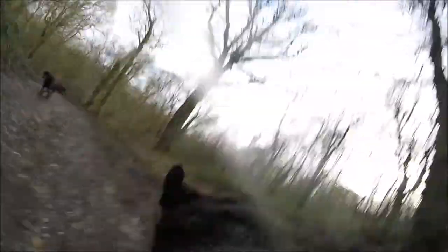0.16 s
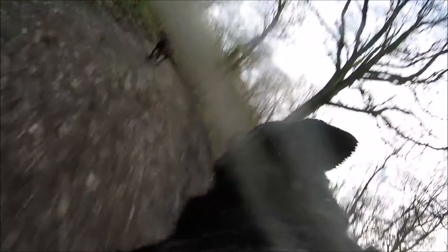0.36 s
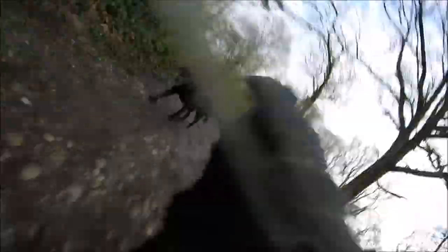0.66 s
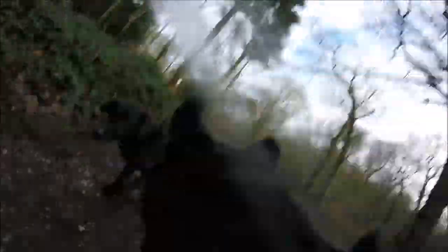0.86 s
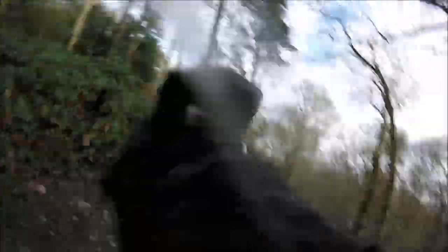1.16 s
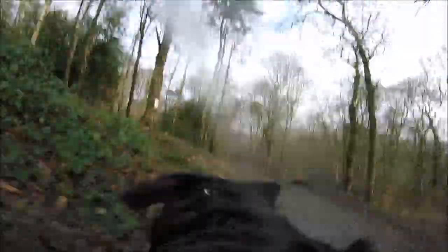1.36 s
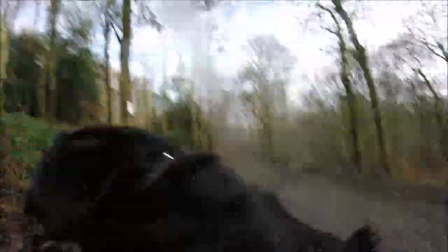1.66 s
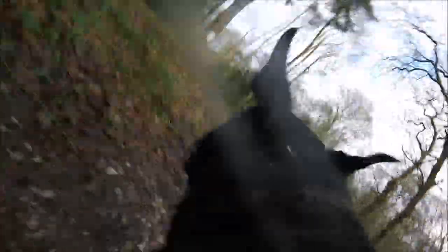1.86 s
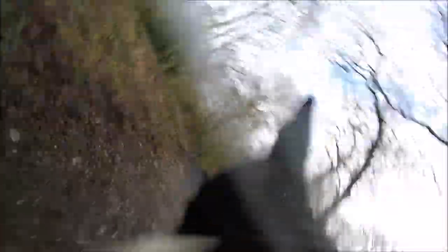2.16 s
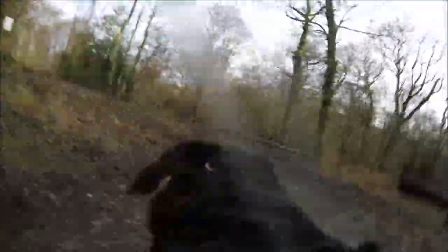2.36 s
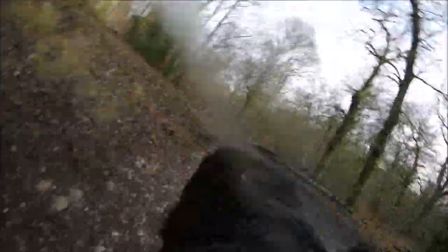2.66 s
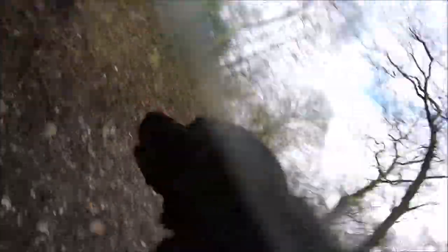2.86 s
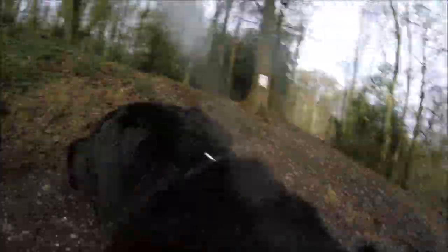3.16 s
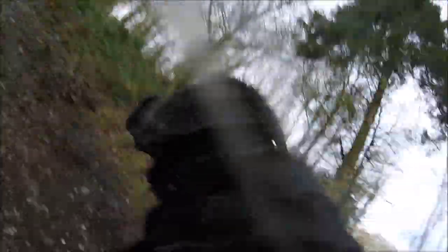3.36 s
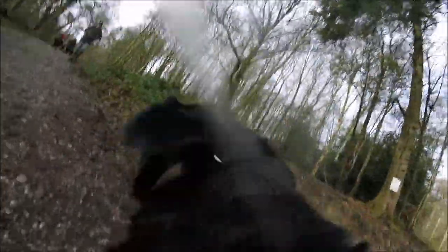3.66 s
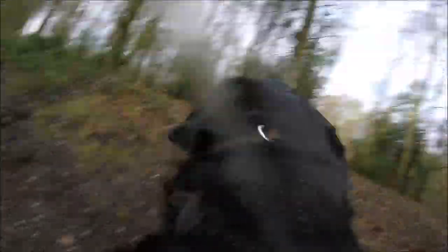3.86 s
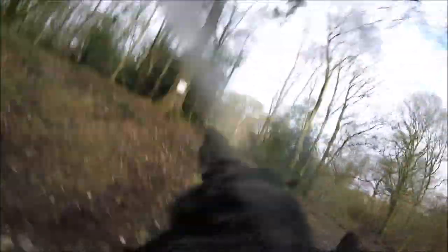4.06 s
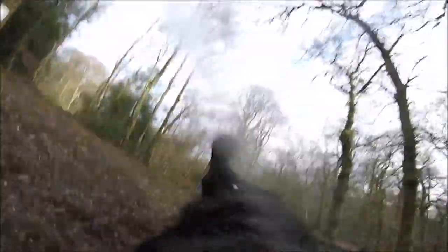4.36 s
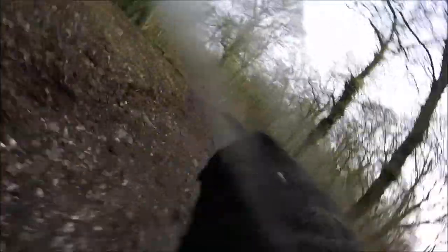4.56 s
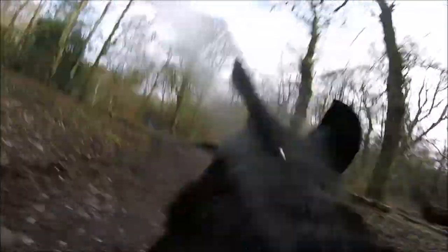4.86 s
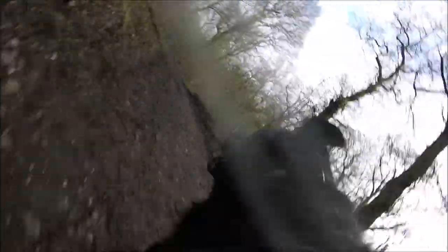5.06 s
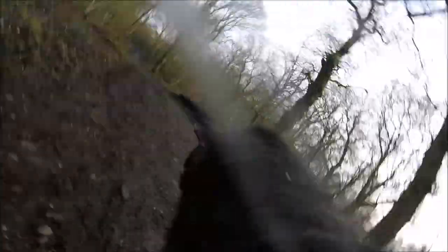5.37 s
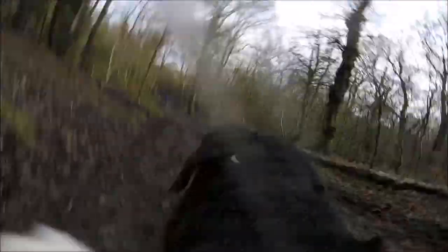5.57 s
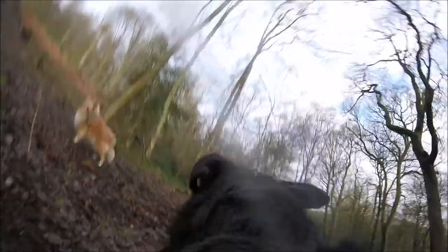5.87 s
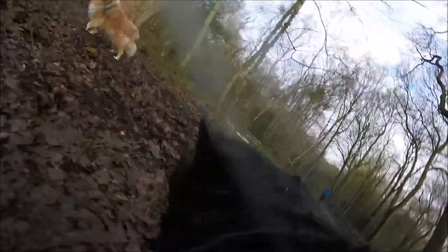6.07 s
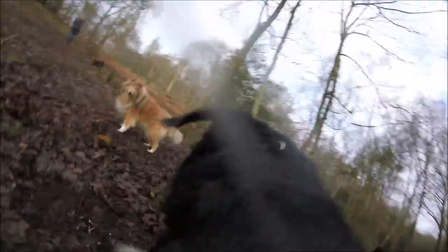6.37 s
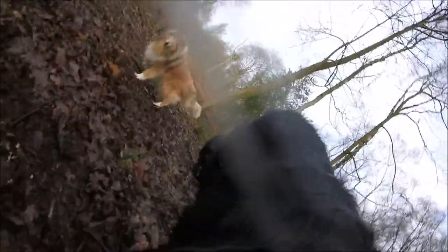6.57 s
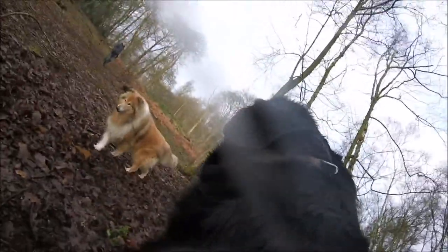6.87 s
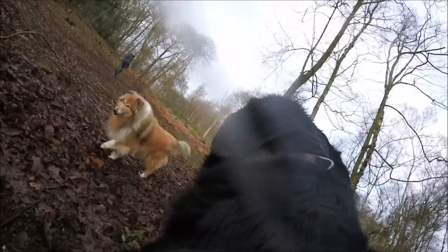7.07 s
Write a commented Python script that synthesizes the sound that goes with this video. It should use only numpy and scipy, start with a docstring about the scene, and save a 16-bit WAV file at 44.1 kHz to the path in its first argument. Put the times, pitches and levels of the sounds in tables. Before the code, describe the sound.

A microphone inside a small plastic housing on a running dog's back picks up close, dry contact noise, with almost no woodland ambience. A heavy thump and strap scrape open the scene, followed by hard knocks near 0.1, 0.2 and 0.5 seconds and a strong double clack at 0.93. Knocks and tiny buckle ticks chatter on, with sharp hits at 1.4 and 1.66, and a heavy jolt with a cluster around 2.2 to 2.35. From about 2.6 to 4 it is sparser: light clicks, low rumble, short gritty rasps. Rubbing swells at 4.1 with a knock, then firm clacks return at 4.5, 5.06, 5.5 and 5.77, with metallic clicks around 5.7. A very brief dropout comes at 5.9. Softer knocks and bright strap rasps continue around 6.3 to 6.7, then the rattling stops, leaving fading rumble and faint hiss until about 7.2.

```python
"""On a woodland trail a dog runs along with a small camera strapped to its back.
The harness fittings knock and chatter against the plastic housing: short pushes, decaying modes and noise cracks.
Straps and fur rub on the same housing: clicks and noise pass through its resonances.
The bouncing body thumps (short swings) and rumbles (low noise), and a faint hiss of coloured noise lies behind."""
import sys
import numpy as np
from scipy import signal
from scipy.fft import rfft, irfft
from scipy.io import wavfile
from scipy.ndimage import uniform_filter1d, minimum_filter1d

SR = 44100
rng = np.random.default_rng(int(sys.argv[2]) if len(sys.argv) > 2 else 0)


def int16_out(signal):
    """Quantize to a 16-bit WAV file."""
    q = np.round(np.clip(np.atleast_2d(signal).T, -1, 1) * 32767)
    wavfile.write(sys.argv[1], SR, q.astype(np.int16))


N = 318402  # length [samples]

# modes of the housing's shell: (frequency [Hz], relative level [dB], time to fall by 60 dB [s])
SHELL_MODES = [(1340, -18, 0.028), (1543, 5, 0.025), (1604, 2, 0.027), (1830, -30, 0.22), (910, -34, .1),
               (544, -13, 0.011)]
# modes of the housing's back plate: (frequency [Hz], relative level [dB], time to fall by 60 dB [s])
PLATE_MODES = [(912.6, -9, 0.033), (984, -6.5, 0.0071), (912, -20, 0.082), (1838, -41.5, 0.18)]
# modes of the metal buckles: (frequency [Hz], relative level [dB], time to fall by 60 dB [s])
BUCKLE_MODES = [(2238, 30, .014), (2396, 26.5, 0.012), (2500, -15.5, 0.021), (2500, -32.5, 0.16),
                (1740, -24, .18), (2780, -1, 0.0034), (3220, -15, 0.0066), (3180, -9, 0.01),
                (3860, -25.5, 0.0073), (3880, -10.5, 0.0075), (4730, 1, .008)]
# spectrum of the hard edge of a contact: (frequency [Hz], relative level [dB])
EDGE_SPECTRUM = [(3500, -32), (5100, -3.5), (6000, 7.5), (7200, -3), (8700, -3), (10000, -16.5),
                 (13500, -21), (15500, -47)]
# background hiss, which the straps' faint creeping follows too: (time [s], level [dB])
HISS_LEVEL = [(0, -46), (.3, -63), (.75, -64), (1.85, -67.5), (2.28, -55), (2.4, -66), (2.75, -64.5),
              (3.3, -63), (4.1, -52), (4.16, -65.5), (4.8, -62), (5.04, -59), (5.12, -56.5), (5.45, -66),
              (5.85, -57.5), (6.3, -59.5), (6.75, -58), (7.22, -64.5)]
# the dog's footfalls:
# (time [s], jolt strength [dB], swing of the mount [Hz], strap rub strength [dB], half length of the rub [s])
STRIDES = [(0.024, -9, 25.1, -47.5, 0.071), (.19, -21.5, 30, -55, 0.07), (0.553, -22.5, 30.7, -55.5, 0.054),
           (0.919, -15.5, 40.4, -64, 0.022), (1.251, -28, 30, -63, 0.064),
           (1.517, -24.5, 54.5, -58.5, 0.077), (1.788, -30.5, 41.2, -57.5, 0.028),
           (2.228, -9, 57.3, -48.5, 0.033), (2.546, -28.5, 41, -61, 0.25), (2.865, -31, 30.2, -57.5, 0.032),
           (3.113, -20.5, 30, -61, 0.11), (3.754, -16.5, 41, -59, .08), (4.069, -22.5, 29.8, -46, 0.029),
           (4.589, -26, 34.7, -55.5, 0.058), (4.943, -16.5, 48, -54.5, 0.063),
           (5.344, -11.5, 35.7, -47, 0.043), (5.678, -15, 36.7, -49.5, 0.14), (6.08, -14, 26.6, -61, 0.053),
           (6.456, -15, 22.76, -45.5, 0.05)]


def undb(db):
    """Turn decibels into gain."""
    return 10 ** (np.asarray(db) / 20)


def unit(x):
    """Scale to rms 1."""
    return x / np.sqrt(np.mean(x ** 2))


def curves(table):
    """Join the columns of a table by straight lines in time."""
    s, *columns = np.transpose(table)
    return [np.interp(np.arange(N) / SR, s, column) for column in columns]


def colour(x, points):
    """Give a signal the spectrum of (Hz, dB) points, at rms 1."""
    hz, db = np.transpose(points)
    f = np.arange(len(x) // 2 + 1) * SR / len(x)
    gain = undb(np.interp(np.log(f + 1), np.log(hz), db))
    return unit(irfft(rfft(x) * gain, len(x)))


def resonate(x, peaks):
    """Pass a signal through parallel (Hz, width in Hz, dB) resonances."""
    return sum(undb(db) * signal.lfilter(*signal.iirpeak(hz, hz / width, SR), x) for hz, width, db in peaks)


def cut(x, hz, kind, order=4):
    """Keep what lies below ("low") or above ("high") a frequency."""
    return signal.sosfilt(signal.butter(order, min(hz, SR * .45), kind, fs=SR, output="sos"), x)


def walk(rate):
    """Wander between random values, `rate` steps a second; hold the last value after 999 steps."""
    steps = np.arange(N) / SR * rate
    return np.interp(steps, np.arange(1000), rng.standard_normal(1000))


def add(track, start_s, sound):
    """Mix a sound into a track, leaving out what lies beyond its ends."""
    i = int(start_s * SR)
    part = sound[max(-i, 0):N - i]
    track[max(i, 0):max(i, 0) + len(part)] += part


def swell(middle_s, half_length_s, db):
    """The power of one smooth stroke that rises and falls."""
    power, t = np.zeros(N), np.arange(-14000, 14000) / SR
    stroke = undb(db) ** 2 * np.exp(-np.abs(t / half_length_s) ** 3)
    add(power, middle_s + t[0], stroke)
    return power


def ring(modes, t, detune, scatter_db):
    """Decaying modes; every contact point weights and loads them a little differently."""
    hz, db, t60 = np.transpose(modes)[:, :, None]
    load, weight = rng.uniform(-0.82, 1, (2, len(modes), 1))
    hz = hz + detune * load / t60  # well damped modes shift most
    level_db = db + scatter_db * weight - 60 * t / t60
    return np.sum(undb(level_db) * np.sin(2 * np.pi * hz * t), axis=0)


def chatter(sound, gap_s, rebound, count=2):
    """A loose fitting rebounds within milliseconds, on average weaker each time."""
    out, lag = sound.copy(), 0
    for k, (wait, force) in enumerate(rng.uniform(.5, 1.5, (count, 2))):
        lag += max(int(gap_s * wait * SR), 1)
        out[lag:] += rebound ** (k + 1) * force * sound[:-lag]
    return out


def blow(sound, db):
    """Set a short sound's level: its whole energy, counted as rms over 10 ms."""
    return sound * undb(db) * np.sqrt(.01 * SR / np.sum(sound ** 2))


def hiss():
    """A faint coloured noise that comes and goes with its level table."""
    # spectrum of the hiss: (frequency [Hz], relative level [dB])
    hiss_spectrum = [(100, -5), (300, -4), (600, -6), (1200, -11), (2500, -8.5), (4000, -17), (7000, -27.5),
                     (10000, -31), (14000, -41)]
    hiss_db, = curves(HISS_LEVEL)
    return colour(rng.standard_normal(N), hiss_spectrum) * undb(hiss_db)


def body(swing_cycles=0.78, shudder_db=-15.5):
    """The running dog shakes the camera: each footfall swings the mount briefly and swells an uneven rumble."""
    # spectrum of the rumble: (frequency [Hz], relative level [dB])
    rumble_spectrum = [(8, 3.5), (25, 3.5), (50, -4.5), (80, -13), (125, -20.5), (200, -33.5), (350, -40.5),
                       (700, -91)]
    # rumble that goes on between footfalls, before its random unevenness: (time [s], level [dB])
    rumble_level = [(0, -27), (.35, -33), (1.9, -37), (2.7, -33), (3.3, -34), (3.95, -23), (4.4, -38.5),
                    (5.2, -37), (6.6, -33.5), (7.22, -45.5)]
    shake_db, shake_spread = -9, 1.26  # rumble of a footfall against its jolt; its length against the rub's
    rumble_db, = curves(rumble_level)
    shakes = sum(swell(s, shake_spread * half_s, db + shake_db) for s, db, _, _, half_s in STRIDES)
    power = undb(rumble_db) ** 2 + shakes
    out = colour(rng.standard_normal(N), rumble_spectrum) * np.sqrt(power) * undb(2.4 * walk(10))

    shudder_spectrum = [(40, -21.5), (80, 5.5), (130, -8.5), (220, -22.5), (500, -43.5), (900, -91.0)]
    shudder = colour(rng.standard_normal(N), shudder_spectrum)
    strain, t = np.zeros(N), np.arange(-4000, 4000) / SR
    for s, db, hz, _, _ in STRIDES:
        bounce = undb(db) * np.exp(-(hz * t / swing_cycles) ** 2)
        add(out, s + t[0], bounce * np.sin(2 * np.pi * hz * t + 1.0))
        add(strain, s + t[0], bounce)
    return out + shudder * strain * undb(shudder_db)  # the mount shudders while it is strained


def sliding(creep_db=-7, creep_grit_db=-24):
    """Power of the straps' scuff and grit: they creep all the time, slide at each footfall and sometimes slip."""
    # a strap slipping under tension with a short bright rasp: (time [s], half length [s], grit strength [dB])
    rasp_table = [(0.019, 0.0055, -47), (.155, 0.0045, -50), (0.176, 0.0077, -50.5), (0.512, .015, -54.5),
                  (1.065, 0.036, -67), (2.497, 0.058, -66), (2.624, 0.021, -64), (2.929, 0.013, -55),
                  (3.197, 0.0038, -61.5), (3.634, 0.0067, -60), (3.806, 0.021, -57), (3.846, 0.011, -44),
                  (3.998, 0.02, -58), (4.095, 0.016, -52), (4.221, .011, -62), (4.568, 0.0064, -44),
                  (5.467, 0.044, -58.5), (5.87, 0.019, -55.5), (6.202, 0.029, -62), (6.398, 0.0051, -47),
                  (6.495, 0.02, -46.5), (6.571, 0.018, -46.5), (6.653, 0.011, -60.5), (6.878, 0.019, -64)]
    rub_lag_s = 0.0072  # the straps slide just after the landing
    rub_grit_db, rasp_scuff_db = -18, 6.5  # grit of a rub against its scuff; scuff of a rasp against its grit
    hiss_db, = curves(HISS_LEVEL)
    creep = undb(hiss_db + creep_db) ** 2
    rubs = sum(swell(s + rub_lag_s, half_s, rub_db) for s, _, _, rub_db, half_s in STRIDES)
    rasps = sum(swell(s, half_s, db) for s, half_s, db in rasp_table)
    scuff_power = creep + rubs + rasps * undb(rasp_scuff_db) ** 2
    grit_power = creep * undb(creep_grit_db) ** 2 + rubs * undb(rub_grit_db) ** 2 + rasps
    return scuff_power, grit_power


def slips(rate, spread_db, smooth):
    """Tiny stick-slip clicks of uneven size, `rate` a second, over a smooth sliding noise."""
    size = undb(spread_db * np.minimum(rng.exponential(size=N), 3))
    clicks = (rng.random(N) < rate / SR) * size * rng.choice([-1, 1], N)
    return unit(unit(clicks) + smooth * rng.standard_normal(N))


def rubbing(scuff_power, grit_power, scuff_gain_db=5, grit_gain_db=3, flutter_db=3):
    """Straps stick and slip over the housing, sounding its resonances as a dull scuff and a bright grit."""
    # resonances of the dull scuff: (frequency [Hz], width [Hz], relative level [dB])
    scuff_peaks = [(210, 140, -23), (570, 350, 7), (870, 55, 10), (1444, 220, 7), (1710, 160, 1),
                   (2230, 690, -1), (2600, 100, 5), (3260, 220, 1)]
    # resonances of the bright grit: (frequency [Hz], width [Hz], relative level [dB])
    grit_peaks = [(4120, 83, 15.5), (4540, 150, 3.5), (6200, 670, 0.5), (7400, 560, -5), (8400, 700, -11.5),
                  (13500, 1900, -14)]
    grip = np.tanh(walk(220) / 2)  # the straps catch and let go; the grip stays put after about 4.5 s
    pressure = undb(flutter_db * np.tanh(walk(45)))  # and flap against the housing
    scuff_push = slips(rate=950, spread_db=4.0, smooth=0.6) * undb(14 * grip) * pressure
    grit_push = slips(rate=450, spread_db=4.2, smooth=.35) * undb(12 * grip) * pressure
    scuff = unit(cut(resonate(scuff_push, scuff_peaks), 3250, "low", order=10))
    grit = cut(resonate(grit_push, grit_peaks), 3100, "high", order=8)
    grit = unit(cut(grit, 11500, "low", order=2))
    scuff = scuff * np.sqrt(scuff_power) * undb(scuff_gain_db)
    return scuff + grit * np.sqrt(grit_power) * undb(grit_gain_db)


RING_TOP_HZ = 4540  # the ringing is cut above this; cracks, scrapes and grit reach higher


def jiggle(scuff_power, rate=40, tick_db=-22, follow=0.66, spread_db=4.0, scrape_db=-15, end_s=6.7):
    """Between the knocks the loose fittings keep ticking, harder while the straps move, until the dog pulls up."""
    rings, scrapes, t = np.zeros(N), np.zeros(N), np.arange(1500) / SR
    for when, size in rng.random((int(rate * end_s), 2)):
        start_s = when * end_s
        tick = undb(-13.5) * ring(BUCKLE_MODES, t, detune=1.6, scatter_db=5.0)
        tick += ring(SHELL_MODES, t, detune=0.74, scatter_db=-0.5)
        tick += undb(-7) * ring(PLATE_MODES, t, detune=.5, scatter_db=4)
        scrape = colour(rng.standard_normal(len(t)), EDGE_SPECTRUM) * np.exp(-t / .0015)
        moving_db = 10 * np.log10(scuff_power[min(int(start_s * SR), N - 1)])
        db = tick_db + follow * moving_db - spread_db * max(np.log(size), -3)  # a few ticks are much harder
        add(rings, start_s, blow(chatter(tick, gap_s=0.0014, rebound=0.39), db))
        add(scrapes, start_s, blow(scrape, db + scrape_db))
    return cut(rings, RING_TOP_HZ, "low", order=8) + scrapes


def clink(t, decay_s=.0022, dense_db=-3):
    """A buckle's clear modes over a short cluster of crowded ones (noise) that changes with every contact."""
    clear = unit(ring(BUCKLE_MODES, t, detune=1.6, scatter_db=14.0))
    crowded_spectrum = [(1400, -19.0), (2200, 11.0), (3300, -8.5), (4400, -24.5), (5400, -41.5)]
    crowded = colour(rng.standard_normal(len(t)), crowded_spectrum)
    return clear + undb(dense_db) * unit(crowded * np.exp(-t / decay_s))


def knocks(push_s=0.000069, crack_s=0.0011, crack_tail_db=-19, crack_tail_s=0.0046):
    """Each knock shoves the housing, rings shell, plate, buckle and leash ring, and starts with a hard crack."""
    # fittings striking the housing: (time [s], strength [dB], hardness [steps, 0 as usual], spot [name])
    knock_table = [(.091, -16, -2.5, "plate"), (0.2042, -22, -0.5, "mount"), (0.2243, -26.5, 1, "shell"),
                   (.252, -39, -.5, "buckle"), (0.274, -44, 1, "mount"), (0.5315, -13.5, -1.5, "shell"),
                   (.568, -33.5, 0, "ring"), (0.5805, -29, -0.5, "buckle"), (0.6663, -30.5, 2, "plate"),
                   (0.8792, -47.5, 1.3, "shell"), (0.9136, -39.5, 1, "ring"), (.9304, -31, 0, "mount"),
                   (0.9333, -13, 0, "shell"), (0.9408, -12.5, 1, "shell"), (1.0291, -35.5, 2, "plate"),
                   (1.0703, -32, .5, "shell"), (1.0937, -32.5, 0, "shell"), (1.111, -32, 0, "shell"),
                   (1.175, -34.5, 0.5, "shell"), (1.2957, -25, 1.33, "plate"),
                   (1.4009, -13.5, 1.63, "shell"), (1.462, -37, 1.4, "shell"), (1.4757, -36, 1.5, "shell"),
                   (1.5576, -43.5, 4.5, "plate"), (1.5711, -36.5, .5, "buckle"),
                   (1.5843, -20.5, 1.3, "shell"), (1.6585, -9.5, 0.67, "shell"),
                   (1.7266, -28.5, 0.83, "shell"), (1.7922, -37.5, 0, "shell"),
                   (1.8051, -43.5, -0.5, "mount"), (1.8274, -42.5, 1, "shell"), (1.9341, -45, .8, "mount"),
                   (1.977, -37, -1.9, "shell"), (1.9817, -30.5, 1.5, "shell"), (2.03, -35.5, 0, "buckle"),
                   (2.038, -30, 1.5, "mount"), (2.0812, -37, 1.3, "shell"), (2.1208, -35.5, 0.93, "shell"),
                   (2.1747, -37.5, 0.9, "mount"), (2.2353, -40, 4, "plate"), (2.253, -35, 3, "plate"),
                   (2.3372, -25.5, -0.5, "shell"), (2.346, -19.5, 0, "shell"),
                   (2.3506, -14.5, -0.1, "shell"), (2.418, -40.5, 0.6, "mount"),
                   (2.4873, -25, -0.1, "shell"), (2.566, -41.5, -0.2, "buckle"),
                   (2.588, -24.5, 1.5, "plate"), (2.7115, -44.5, -0.16, "buckle"),
                   (2.908, -23, -1, "plate"), (3.1122, -23.5, 0.98, "shell"), (3.2798, -39, 2, "plate"),
                   (3.6998, -36.5, 2, "shell"), (3.7178, -36, 0.66, "shell"), (3.8338, -32.5, 3.5, "plate"),
                   (4.1051, -31.5, 0.5, "buckle"), (4.1112, -37.5, 0.6, "buckle"),
                   (4.1342, -18, 0.24, "mount"), (4.212, -47.5, -0.14, "buckle"),
                   (4.2531, -40.5, -0.3, "mount"), (4.324, -52, -1, "mount"), (4.375, -49, 0.5, "buckle"),
                   (4.4454, -50, 0, "buckle"), (4.5174, -18.5, -1.2, "shell"), (4.5642, -33, 2.5, "plate"),
                   (4.699, -41, .5, "mount"), (4.846, -43, 0, "buckle"), (4.9536, -29.5, 1.04, "shell"),
                   (5.0648, -15.5, -.7, "plate"), (5.1946, -42, .8, "shell"), (5.2354, -39, 1.25, "mount"),
                   (5.365, -33, 0.63, "buckle"), (5.488, -16.5, -0.7, "plate"), (5.5081, -30.5, 3, "plate"),
                   (5.585, -26, 1.33, "shell"), (5.6013, -36.5, 1.8, "mount"),
                   (5.676, -21.5, -0.06, "buckle"), (5.6877, -26.5, 0, "buckle"),
                   (5.6998, -29, -1, "buckle"), (5.772, -15.5, -0.5, "shell"), (5.776, -20, 1.6, "shell"),
                   (5.8422, -34, .5, "mount"), (6.0048, -38, 1.44, "shell"), (6.057, -29, 0, "shell"),
                   (6.3166, -24, -2, "plate"), (6.4219, -31.5, 0.5, "shell"), (6.5703, -26, -0.5, "plate"),
                   (6.668, -26.5, 0.9, "shell")]
    # what a blow sounds, by the spot it lands on, against its strength:
    # (thud [dB], shell [dB], back plate [dB], buckle [dB], leash ring [dB], crack [dB])
    spot_mix = {"shell": (-7.5, 2.5, -15, -10.5, -38, -32.5), "plate": (-21.5, -4, 4.5, -23, -31.5, -35.5),
                "buckle": (-13.5, 0.5, -9, 2.5, -31.5, -22), "mount": (5, 0.5, -9, -9.5, -36, -29),
                "ring": (-8.5, -22, -22.5, -11.5, -0.5, -15.5)}
    # modes of the small leash ring: (frequency [Hz], relative level [dB], time to fall by 60 dB [s])
    leash_modes = [(3000, -4.5, 0.0049), (3320, 4.5, 0.017), (3335, 4, 0.0027), (4010, -1.5, 0.015)]
    # dB per step of hardness: a harder contact has less thud and more metal and crack
    hard_thud_db, hard_metal_db, hard_crack_db = -5, 6.5, 4.5
    # the plate's share falls by this many dB for each dB that a blow exceeds the usual one
    plate_give, usual_knock_db = 0.14, -22.5

    rings, cracks, t = np.zeros(N), np.zeros(N), np.arange(6000) / SR
    push = cut(t / push_s * np.exp(-t / push_s), 86, "high", order=1)
    push = cut(push, 980, "low", order=3)
    crack_shape = np.exp(-t / crack_s) + undb(crack_tail_db) * np.exp(-t / crack_tail_s)
    for s, db, hardness, spot in knock_table:
        thud_db, shell_db, plate_db, buckle_db, leash_db, crack_db = spot_mix[spot]
        thud = blow(chatter(push, gap_s=.0024, rebound=0.35), thud_db + hard_thud_db * hardness)

        shell = ring(SHELL_MODES, t, detune=0.85, scatter_db=2.0)
        shell = blow(chatter(shell, gap_s=0.0011, rebound=0.54, count=1), shell_db)

        plate = chatter(ring(PLATE_MODES, t, detune=0.5, scatter_db=3.0), gap_s=0.0023, rebound=0.46)
        plate = blow(plate, plate_db - plate_give * (db - usual_knock_db))

        leash = blow(ring(leash_modes, t, detune=1.9, scatter_db=8.5), leash_db)
        metal = blow(clink(t), buckle_db) + leash
        metal = chatter(metal, gap_s=0.0012, rebound=0.54) * undb(hard_metal_db * hardness)

        crack = colour(rng.standard_normal(len(t)), EDGE_SPECTRUM) * crack_shape
        crack = blow(crack, crack_db + hard_crack_db * hardness)
        start_s = s - .0002  # begin a touch early
        add(rings, start_s, -undb(db) * (thud + shell + plate + metal))
        add(cracks, start_s, undb(db) * crack)
    return cut(rings, RING_TOP_HZ, "low", order=8) + cracks


def dip(x):
    """The level dips briefly, with 3 ms slopes."""
    start_s, end_s, dip_db = 5.877, 5.907, -26
    s = [start_s - .003, start_s, end_s, end_s + .003]
    return x * undb(np.interp(np.arange(N) / SR, s, [0, dip_db, dip_db, 0]))


def scene():
    """Everything reaches one microphone inside the housing, so all layers simply add up."""
    scuff_power, grit_power = sliding()
    background = hiss() + body()
    contacts = rubbing(scuff_power, grit_power) + jiggle(scuff_power) + knocks()
    return dip(background + contacts)[None]


def record(dry):
    """Peaks that overload the camera, as the hardest knocks do, are squashed; the top is cut."""
    top_hz = 14800
    allowed = 1 / np.maximum(np.abs(dry), 1)
    gain = minimum_filter1d(allowed, size=21)
    gain = uniform_filter1d(uniform_filter1d(gain, size=11), size=11)  # smooth the gain changes
    return signal.sosfilt(signal.ellip(8, .2, 70, top_hz, fs=SR, output="sos"), dry * gain)


dry = scene()
out = record(dry)
int16_out(out)
```